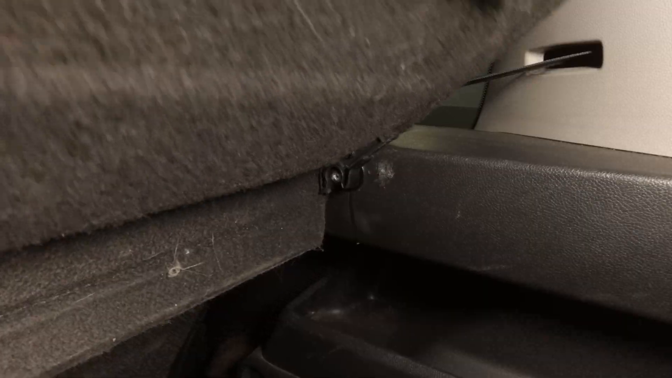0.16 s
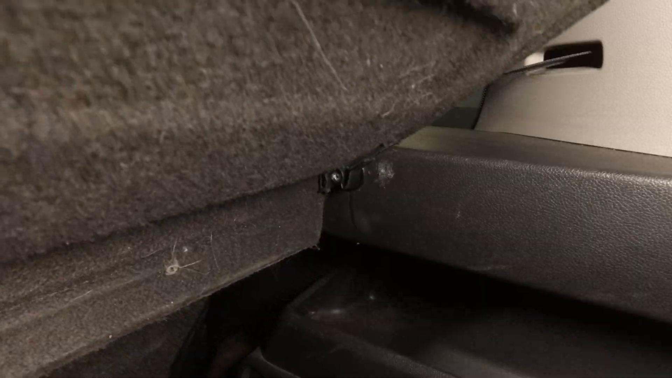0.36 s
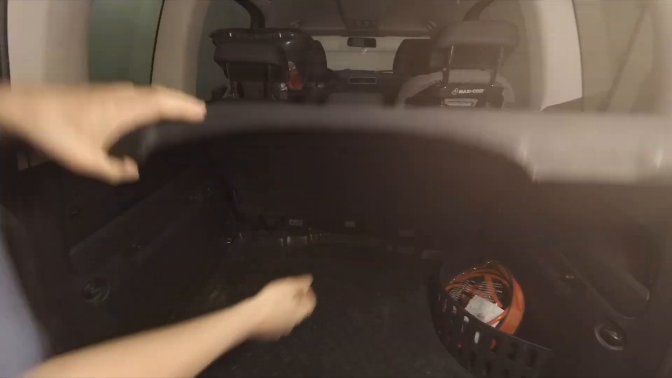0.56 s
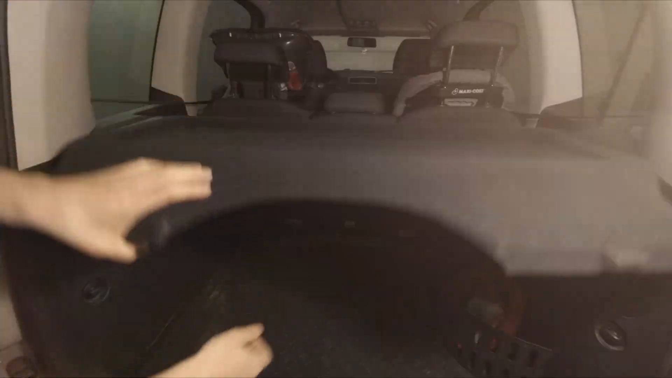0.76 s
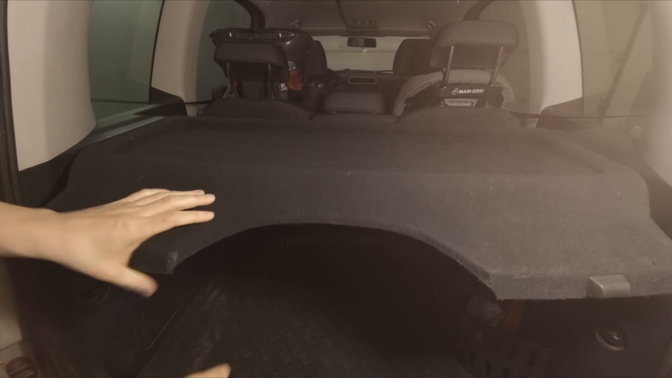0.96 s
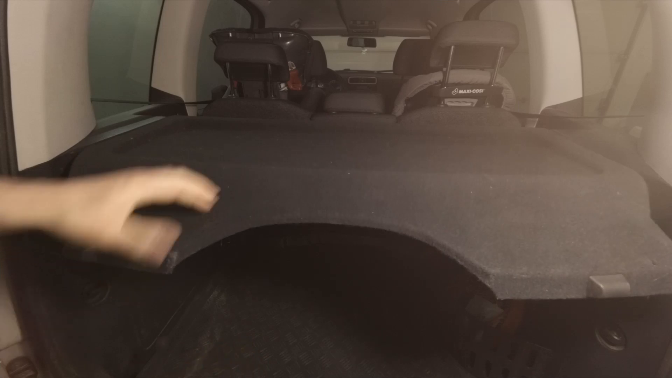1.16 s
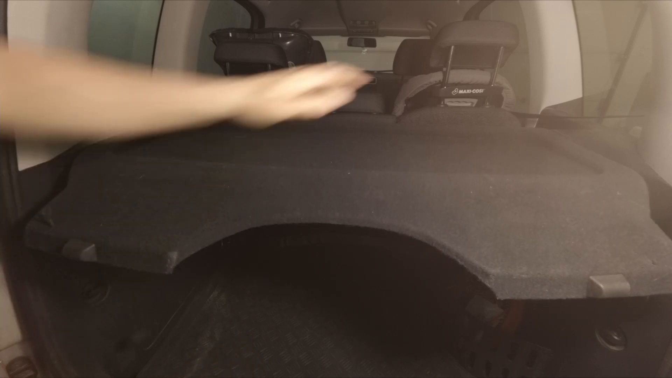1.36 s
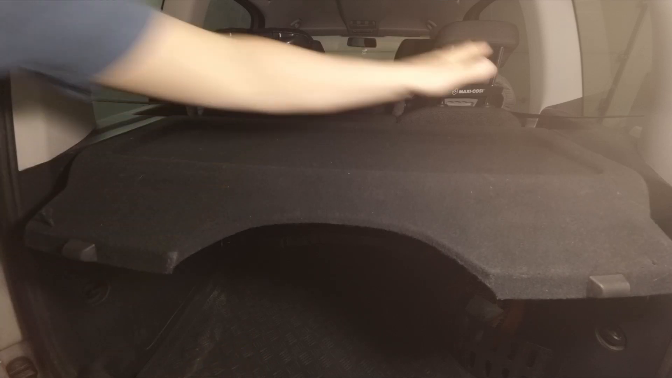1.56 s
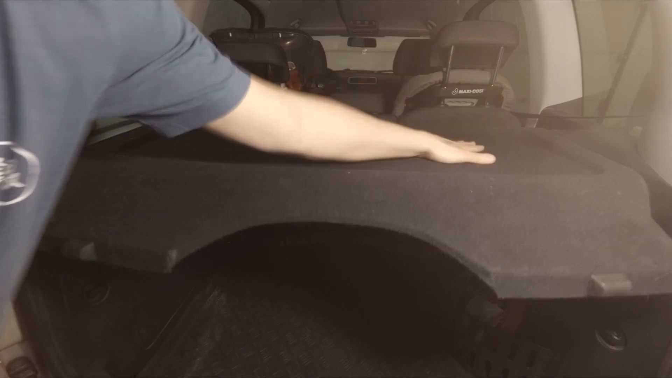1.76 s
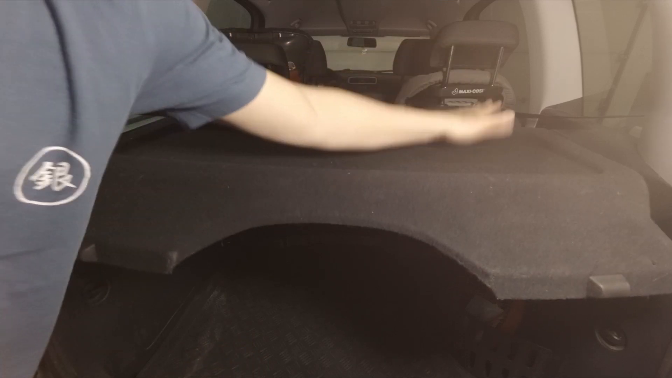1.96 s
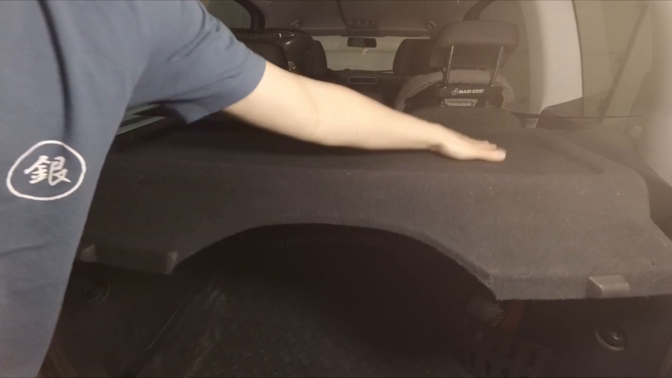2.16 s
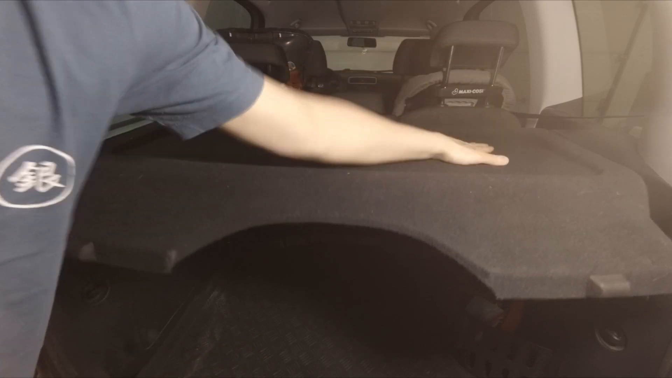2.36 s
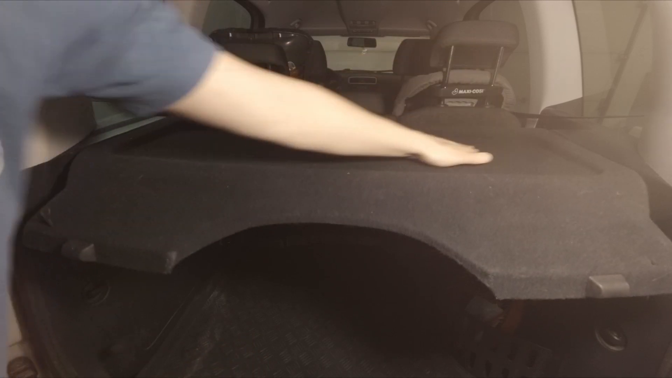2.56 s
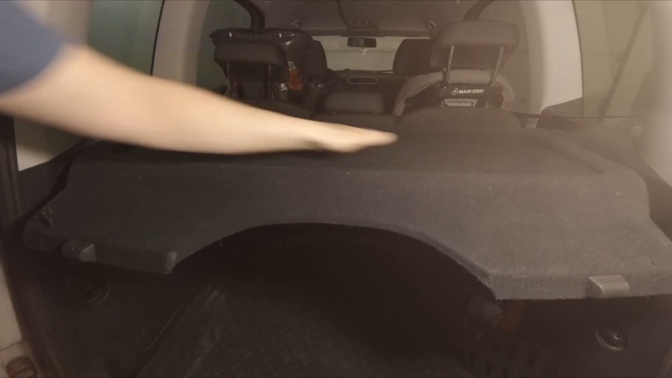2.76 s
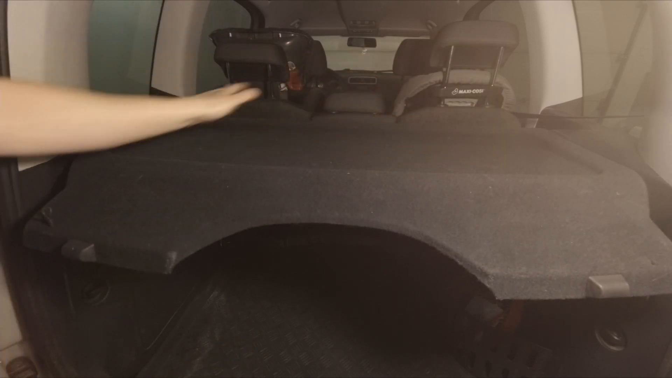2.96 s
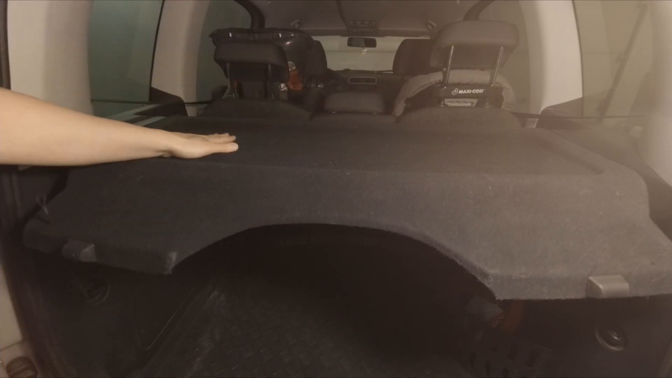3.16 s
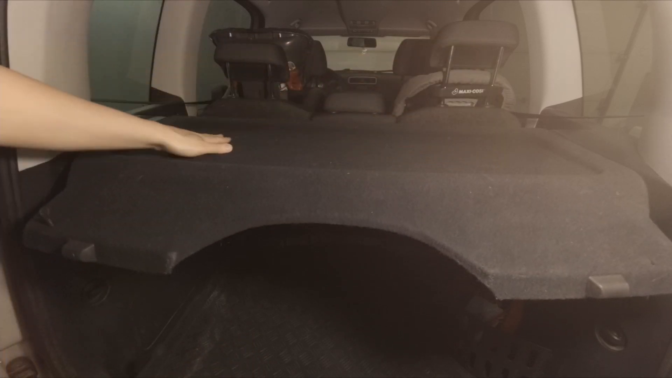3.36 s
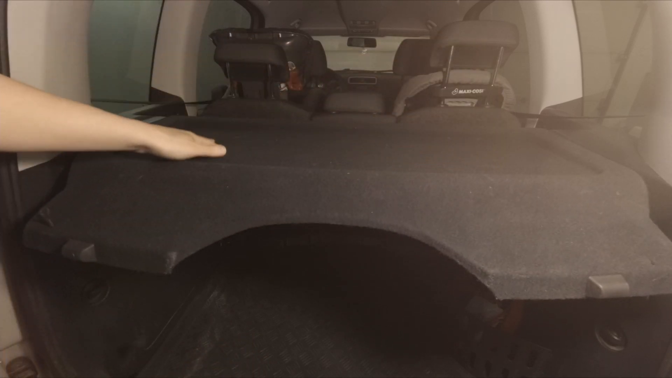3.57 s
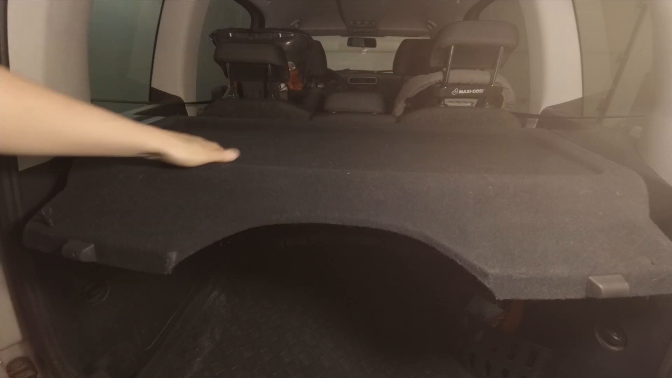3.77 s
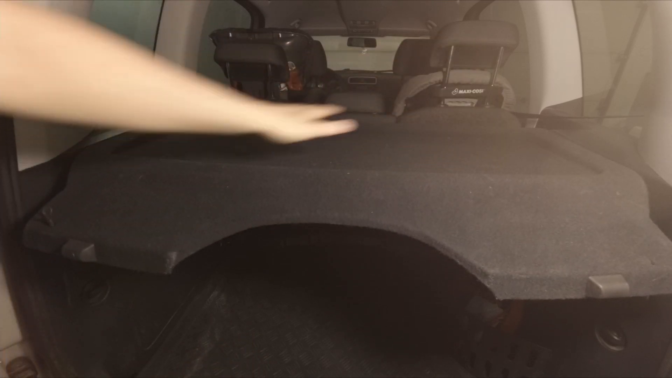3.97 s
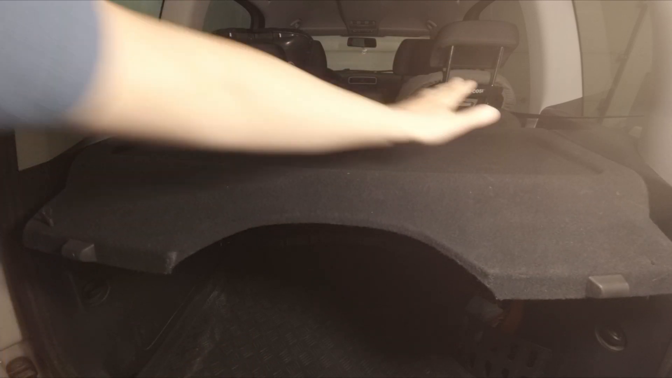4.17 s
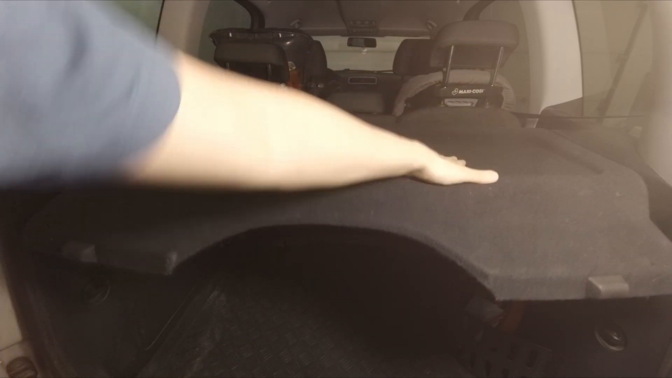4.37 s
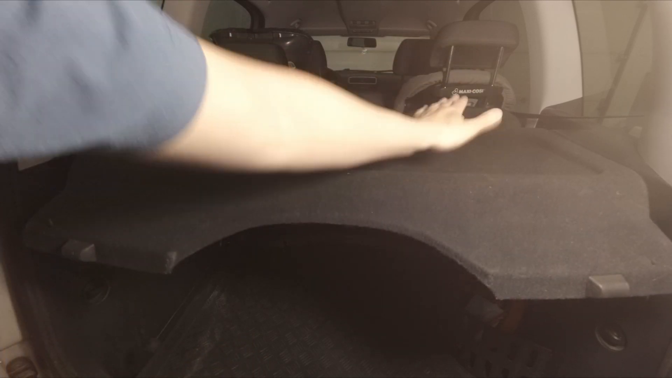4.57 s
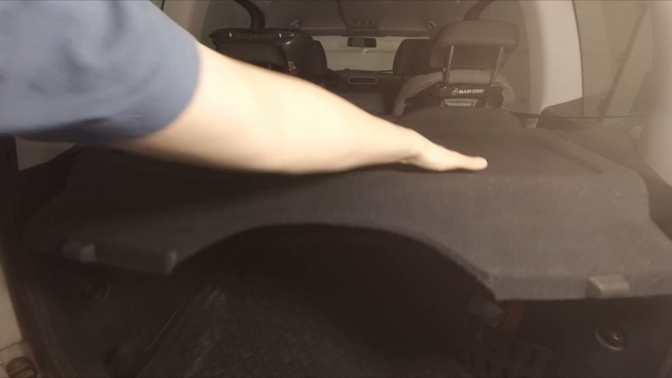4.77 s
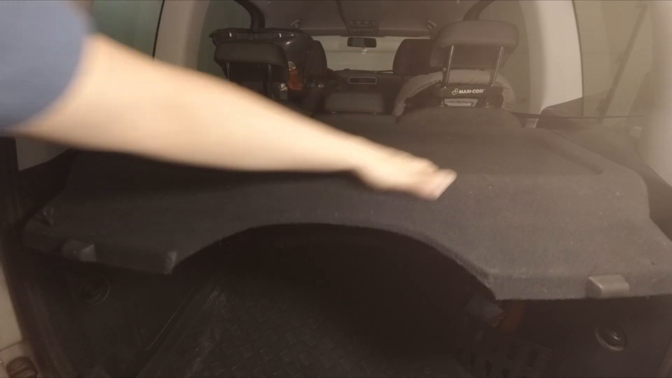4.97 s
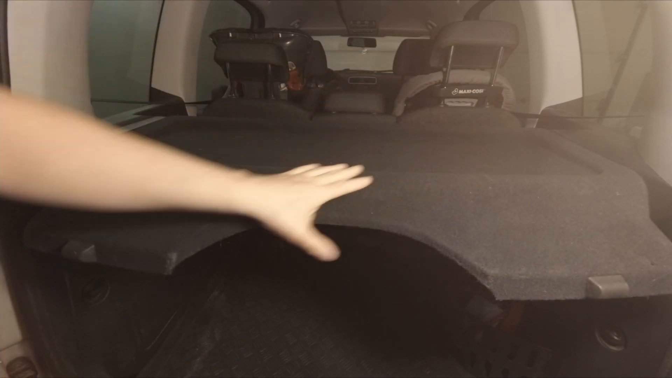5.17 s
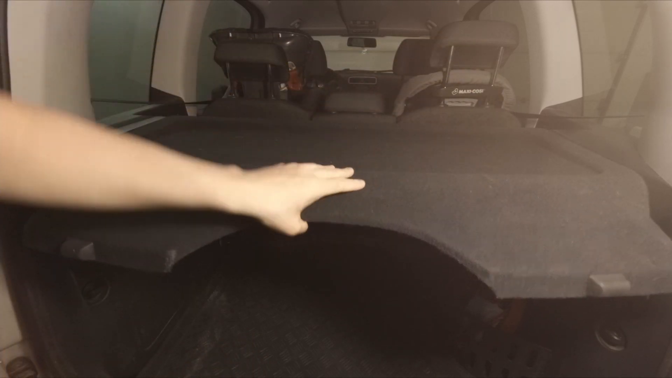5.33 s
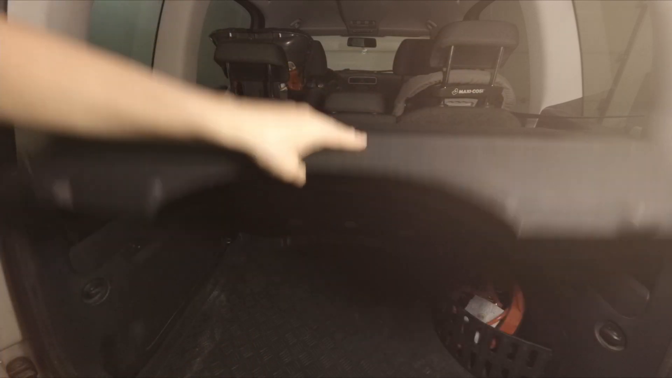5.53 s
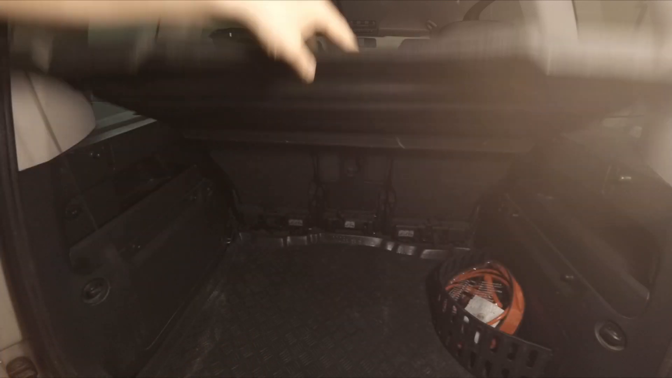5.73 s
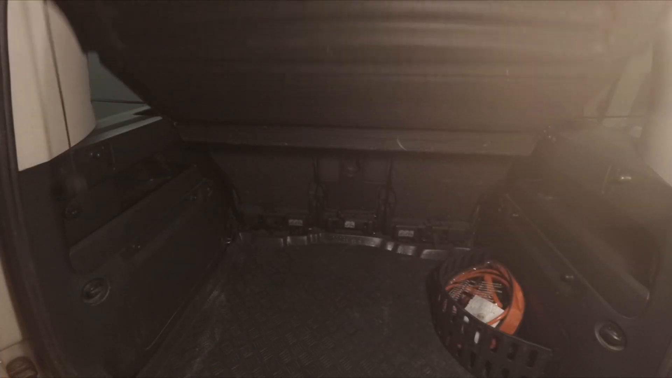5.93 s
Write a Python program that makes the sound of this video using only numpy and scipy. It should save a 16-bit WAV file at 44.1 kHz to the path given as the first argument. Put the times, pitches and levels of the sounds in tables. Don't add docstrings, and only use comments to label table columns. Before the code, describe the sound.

Near silence with tiny trim ticks, then a felted board grinds down on a slipping plastic pivot and clatters onto its pins. Six hard open-hand slaps follow, three close together, one alone, then a pair, each a dull woody thud with low trunk boom, bright rattle and short garage echo whose tail is cut down quickly. Soft skin hiss, scraping and a faint creak end it. Close mono microphone.

```python
import sys
import numpy as np
from scipy import signal
from scipy.fft import rfft, irfft, next_fast_len
from scipy.io import wavfile
from scipy.ndimage import uniform_filter1d, map_coordinates

SR = 44100
rng = np.random.default_rng(int(sys.argv[2]) if len(sys.argv) > 2 else 0)


def generate_wav(sig):
    pcm = np.round(np.clip(np.atleast_2d(sig).T, -1, 1) * 32767).astype(np.int16)
    wavfile.write(sys.argv[1], SR, pcm)


def amplitude_ratio(level_db):
    exponent = np.asarray(level_db, float) / 20
    return 10 ** exponent


N = 264588


def unit(x):
    return x / np.sqrt(np.mean(x ** 2) + 1e-20)


def along(points, hz):
    f, v = np.transpose(points)
    return np.interp(np.log(hz + 1), np.log(f + 1), v)


def noise(size, spectrum, tilt_db=0):
    m = next_fast_len(size)
    hz = np.fft.rfftfreq(m, 1 / SR)
    gain = amplitude_ratio(along(spectrum, hz) + tilt_db * np.log2(1 + hz / 1000))
    return unit(irfft(rfft(rng.standard_normal(m)) * gain, m)[:size])


def hump(hz, skirt_db):
    return [(hz / 5, 3 * skirt_db), (hz / 2, skirt_db), (hz, 0), (hz * 1.3, skirt_db), (hz * 5, 3 * skirt_db)]


def wobble(rate):
    knots = rng.standard_normal(int(N * rate / SR) + 4)
    return map_coordinates(knots, [np.arange(N) * rate / SR])


def add(out, s, sound):
    out[round(s * SR):][:len(sound)] += sound


# f/Hz, t60/s
GARAGE_DECAY = [(100, 0.6), (400, 0.64), (1500, 0.84), (5000, 1), (12000, 0.42)]


def garage(x, wet_db, size):
    hz, t, z = signal.stft(rng.standard_normal(size), SR, nperseg=256)
    fade = amplitude_ratio(-60 * t / along(GARAGE_DECAY, hz)[:, None])
    tail = signal.istft(z * fade, SR, nperseg=256)[1]
    tail = tail / np.linalg.norm(tail)
    wet = signal.fftconvolve(np.pad(x, (300, 0)), tail)[:len(tail)]
    return np.pad(x, (0, len(wet) - len(x))) + amplitude_ratio(wet_db) * wet


# f/Hz, level/dB, t60/s
BOARD_TONES = [(195.5, 10, 0.4), (310, -3, 1), (371, -27, 0.99), (420, -10, 0.44), (566.8, -6, 1),
               (690, -13.5, 0.77), (940, -1, 0.071), (1022, -20.5, 0.62), (1045, -11, 0.26),
               (1143.5, -14.5, 0.99)]


def ring(t, scatter_db, shorten):
    out = 0
    for hz, db, t60 in BOARD_TONES:
        fade = amplitude_ratio(db + scatter_db * rng.standard_normal() - 60 * t / (t60 * shorten))
        out = out + fade * np.sin(2 * np.pi * hz * t)
    return out


# f/Hz, level per Hz/dB
BOARD_SHUDDER = [(82, -23.5), (140, -0.5), (498, -4.5), (903, -8), (1480, -12.5), (1640, -16), (2630, -22),
                 (2850, -25.5), (5820, -35.5), (8830, -38.5), (10600, -50.5), (13100, -52), (16000, -63)]


def strike_board(rows, rise_s, t60_s, room_db):
    out, t = np.zeros(N + SR), np.arange(SR // 4) / SR
    for s, db, hz, thud_db, hard_db in rows:
        press = t * hz / 0.56
        thud = np.sin(2 * np.pi * hz * t) * amplitude_ratio(thud_db - 1.5) * press * np.exp(1 - press)
        grains = np.interp(t * 400, np.arange(128), rng.standard_normal(128))
        chatter = amplitude_ratio(3.5 * grains)
        shudder = unit(noise(len(t), BOARD_SHUDDER, hard_db) * chatter) * amplitude_ratio(-4 - 60 * t / t60_s)
        tones = amplitude_ratio(-19.5) * ring(t, scatter_db=3, shorten=0.23)
        blow = thud + (1 - np.exp(-t / rise_s)) * (shudder + tones)
        add(out, s, amplitude_ratio(db) * garage(blow, wet_db=room_db, size=SR * 2 // 3))
    return out[:N]


# t/s, peak level/dB, thud f/Hz, thud share/dB, hardness/dB per octave
SLAPS = [(1.834, -25, 477, -4, -6), (1.838, -3, 415, -4, -3.5), (1.846, -5.5, 430, -3.5, 3),
         (1.856, -10.5, 330, -1.5, 1.5), (2.131, -3, 416, 4, 0.5), (2.138, -6.5, 620, -1.5, 3),
         (2.143, -7.5, 278, 1.5, 0.5), (2.4362, -2, 594, 0, -2), (2.447, -5, 410, -3.5, 2.5),
         (3.155, -48, 300, -4, -7), (3.1699, -10.5, 450, 5.5, 0.5), (3.1797, -5, 309, -7.5, 2.5),
         (4.392, -45, 334, -7.5, 0), (4.396, -32, 400, -6, 1), (4.401, -13, 613, -6.5, -2),
         (4.404, -12.5, 373, 2, 2.5), (4.411, -10.5, 430, 0.5, -7), (4.7558, -4.5, 825, -8.5, 1),
         (4.761, -3.5, 343, -5.5, -2)]


def slaps():
    return strike_board(SLAPS, rise_s=0.003, t60_s=0.079, room_db=-8)


# t/s, peak level/dB, hardness/dB per octave
PIN_BOUNCES = [
    (1.895, -15, 4),
    (2.189, -24, 5.5),
    (2.495, -10, 2),
    (3.234, -17, 1.5),
    (3.26, -16, -4.5),
    (4.458, -13.5, -1.5),
    (4.807, -8.5, -3),
    (4.898, -17.5, -2),
]


def bounces():
    rows = [(s, db, 330, -13.5, hard_db) for s, db, hard_db in PIN_BOUNCES]
    return strike_board(rows, rise_s=0.008, t60_s=0.1, room_db=-8)


# t/s, peak level/dB, thud f/Hz, thud share/dB, hardness/dB per octave
PIN_DROPS = [
    (0.9577, -22.5, 414, 0.5, -0.5),
    (.9725, -10, 358, -8, 0),
    (.979, -16, 406, -3, -2),
    (.987, -14, 250, -0.5, -11),
    (.999, -20, 294, -3, -1),
    (1.013, -20, 140, 3, -6),
    (5.48, -42, 353, -1.5, -5),
    (5.498, -39, 629, -1, -8),
    (5.515, -40.5, 222, 2.5, -12),
]


def drops():
    return strike_board(PIN_DROPS, rise_s=0.003, t60_s=0.062, room_db=-11.5)


def gate(x, threshold_db, depth_db):
    level_db = 10 * np.log10(np.abs(uniform_filter1d(x ** 2, 2500)) + 1e-12)
    return x * amplitude_ratio(np.clip(level_db - threshold_db, depth_db, 0))


# t/s, air level/dB, lid level/dB, air t60/s, lid t60/s
TRUNK_BOOMS = [(.76, -72, -63, .6, 0.73), (.91, -49, -48, 0.41, 0.61), (.96, -32, -20, 0.29, .22),
               (1.07, -50.5, -44, 1.1, .7), (1.837, -28, -21, 0.58, 0.44), (1.99, -44.5, -36, 1.17, 1.3),
               (2.13, -27, -23.5, 0.6, 0.58), (2.437, -24.5, -23, 0.56, .5), (2.6, -36.5, -37, .6, 0.47),
               (3.0, -63.5, -73, 1.2, 0.82), (3.169, -38.5, -20.5, .9, 0.57),
               (4.399, -35.5, -20.5, 0.5, 0.44), (4.56, -43.5, -40, .7, 0.81),
               (4.757, -38, -35.5, 0.91, 1.1), (4.82, -40.5, -31.5, 0.93, .75),
               (5.485, -47, -47, 0.56, .28)]
# f/Hz, level/dB
AIR_MODES = [(62, -13.5), (68, 0)]
# f/Hz, level/dB
LID_MODES = [(111, -2.5), (120, 1), (150, -7.5)]


def trunk():
    time = np.arange(N) / SR
    start, air_db, lid_db, air_t60, lid_t60 = np.transpose(TRUNK_BOOMS)[..., None]
    since = np.clip(time - start, 0, None)
    rest_db, gate_db, fade = -84, -56, 1.8
    out = 0
    for db, t60, build_s, modes in (air_db, air_t60, 0.018, AIR_MODES), (lid_db, lid_t60, 0.02, LID_MODES):
        build = 1 - np.exp(-(since / build_s) ** 2)
        gain = np.sum(amplitude_ratio(db + 1.5 - 60 * since / t60) * build, axis=0)
        gain = gain * np.minimum(1, gain / amplitude_ratio(gate_db)) ** fade
        flutter = amplitude_ratio(2.5 * wobble(16))
        tones = sum(amplitude_ratio(mode_db) * np.sin(2 * np.pi * hz * time + 2.4 * wobble(10)) for hz, mode_db in modes)
        out = out + (gain + amplitude_ratio(rest_db)) * flutter * unit(tones)
    return out


def click_plastic(rows, click_hz, t60_s, rise_s):
    out, t = np.zeros(N + SR), np.arange(SR // 10) / SR
    for s, db, body_db, body_hz in rows:
        fade = amplitude_ratio(-60 * t / t60_s - 3.5) + amplitude_ratio(1.5 - 60 * t / 0.0074)
        click = noise(len(t), hump(click_hz, skirt_db=-5.5)) * fade
        knock = noise(len(t), hump(body_hz, skirt_db=-13)) * amplitude_ratio(body_db - 60 * t / (2.05 * t60_s))
        contact = (1 - np.exp(-t / rise_s)) * (click + knock)
        add(out, s, amplitude_ratio(db - 8) * garage(contact, wet_db=-10.5, size=SR // 3))
    return out[:N]


# t/s, peak level/dB
PIN_RATTLES = [(1.2521, -63), (1.6395, -56), (1.738, -50), (1.7514, -53), (1.7664, -43.5), (1.786, -48),
               (1.8512, -16), (1.8982, -20.5), (2.1472, -21), (2.19, -22.5), (2.4498, -16.5),
               (2.4974, -22.5), (3.1837, -22), (3.2344, -38.5), (4.4074, -32), (4.4664, -45.5),
               (4.764, -32.5), (4.813, -30), (5.7565, -42)]


def rattles():
    rows = [(s, db, -12, 1500) for s, db in PIN_RATTLES]
    return click_plastic(rows, click_hz=7200, t60_s=0.036, rise_s=0.002)


# t/s, peak level/dB, body level/dB, body f/Hz
PIVOT_SLIPS = [(0.4683, -32.5, -14, 614), (0.4978, -25, -2, 626), (0.5341, -52, 3, 1390),
               (0.5694, -43, 13, 579), (0.5948, -35, -8, 345), (0.614, -33, -9, 676),
               (0.6408, -37, -21, 614), (0.6777, -35.5, -19, 568), (0.7446, -35, -14, 1530),
               (0.7546, -33, -7, 260), (0.7771, -38, -1, 212), (0.8043, -29, -20, 202),
               (0.823, -29.5, -20, 275), (0.849, -26.5, -1, 198), (0.889, -28, -0.5, 435),
               (0.9334, -31, 2, 401), (1.0279, -21.5, -21, 202), (1.043, -27.5, -14, 256),
               (1.0544, -34.5, -5, 320), (1.0733, -37, 10, 525), (1.103, -52, -12, 234),
               (1.1218, -37, -8, 221), (1.1998, -40.5, -2, 415)]


def slips():
    return click_plastic(PIVOT_SLIPS, click_hz=3500, t60_s=0.024, rise_s=0.001)


# t/s, peak level/dB, body level/dB, body f/Hz
TRIM_TICKS = [(0.0374, -61.5, 14.5, 312), (0.2384, -56, 22, 346), (0.286, -41.5, -6, 818),
              (0.2944, -50.5, 5, 1210), (0.3734, -53, 4, 1200), (0.397, -52, 7, 388), (0.41, -51.5, 7, 336),
              (2.955, -49, 5, 452), (3.0896, -59, 9.5, 290), (3.4007, -44.5, -0.5, 220),
              (3.488, -41, 0, 511), (3.7819, -51, 0, 258), (3.8341, -54, -3, 371),
              (3.9123, -51.5, 4.5, 200)]


def ticks():
    return click_plastic(TRIM_TICKS, click_hz=4020, t60_s=0.023, rise_s=0.001)


def swells(start, top, end):
    time = np.arange(N) / SR
    edges = np.clip(np.minimum(time - start, end - time) / 0.015, 0, 1)
    return edges * amplitude_ratio(np.interp(time, [start, top, end], [-18.5, 0, -23]))


# start t/s, fastest t/s, end t/s, hiss level/dB, scrape level/dB
MOVES = [(0.453, 0.489, 0.83, -52.5, -48), (0.71, .8, 1.03, -57.5, -56), (.8, 0.893, 1.1, -61, -53),
         (1.317, 1.393, 1.72, -52, -96), (2.493, 2.58, 2.92, -62, -44), (2.55, 2.66, 2.74, -56, -55),
         (.87, .9, .96, -58, -46), (3.38, 3.48, 3.53, -66, -58), (3.3, 3.376, 3.12, -68, -54),
         (3.55, 3.651, 3.94, -73.5, -70), (4.844, 4.982, 5.214, -64, -44.5),
         (4.892, 5.172, 5.32, -53, -65.5), (5.098, 5.329, 5.48, -54.5, -84),
         (5.304, 5.42, 5.03, -59, -75.5), (1.515, 1.724, 1.84, -69, -75), (0, 0.046, 0.13, -97, -78),
         (5.395, 5.495, 5.78, -70, -65), (5.597, 5.85, 6.22, -71, -73.5)]
# f/Hz, level per Hz/dB
FELT_HISS = [(590, -46), (1000, -12), (1080, -26), (1260, -7), (1960, 3.5), (2150, -1.5), (3340, 1),
             (4120, -0.5), (4470, 3.5), (5440, -2.5), (7880, 1), (12800, -11.5), (16000, -27)]
# f/Hz, level per Hz/dB
SLIDE_HISS = [(410, -37), (700, -10.5), (1460, -3.5), (1970, -4.5), (2660, -4), (5190, -8.5), (12000, -10),
              (14200, -18.5), (16000, -35.5)]
# f/Hz, level per Hz/dB
BOARD_SCRAPE = [(47, -39.5), (80, -17.5), (131, 2.5), (470, 5.5), (575, 7), (1170, 0.5), (1430, -1),
                (2500, -13), (3250, -35.5), (5500, -120)]


def strokes():
    time = np.arange(N) / SR
    palm = np.where(time < 2, noise(N, FELT_HISS), noise(N, SLIDE_HISS))
    grit_db = 2.5 * (time < 1.25) * wobble(90)
    hiss = unit(palm * amplitude_ratio(0.77 * wobble(220) + grit_db))
    scrape = unit(noise(N, BOARD_SCRAPE) * amplitude_ratio(3.5 * wobble(70)))
    hiss_gain, scrape_gain = amplitude_ratio(-77.5), amplitude_ratio(-74.5)
    for start, top, end, hiss_db, scrape_db in MOVES:
        speed = swells(start, top, end)
        hiss_gain = hiss_gain + amplitude_ratio(hiss_db) * speed
        scrape_gain = scrape_gain + amplitude_ratio(scrape_db) * speed
    return hiss_gain * hiss + scrape_gain * scrape


# start t/s, end t/s, level/dB, first f/Hz, last f/Hz
RUBBING_CREAKS = [
    (.48, 0.595, -44, 1350, 1400),
    (1.31, 1.66, -73, 1720, 1880),
    (5.18, 5.378, -61, 1416, 1520),
    (5.76, 5.999, -70.5, 1330, 1180),
]


def creaks():
    time = np.arange(N) / SR
    knots, gain = [], 0
    for start, end, db, first_hz, last_hz in RUBBING_CREAKS:
        knots += [(start, first_hz), (end, last_hz)]
        gain = gain + amplitude_ratio(db) * swells(start, start + 0.42 * (end - start), end)
    pitch_hz = np.interp(time, *np.transpose(knots))
    return gain * unit(wobble(380) * np.sin(2 * np.pi * np.cumsum(pitch_hz) / SR))


# f/Hz, level per Hz/dB
GARAGE_AIR = [(15, -18), (25, -16), (64, -6.5), (127, -8.5), (317, -10), (427, -18.5), (659, -14),
              (734, -9), (911, -10), (1260, -10.5), (2280, -19.5), (14800, -38), (16000, -36.5)]
# f/Hz, level/dB
ELECTRIC_WHINE = [(15235, -91)]


def air():
    time = np.arange(N) / SR
    whine = sum(amplitude_ratio(db + 1) * np.sin(2 * np.pi * hz * time) for hz, db in ELECTRIC_WHINE)
    return whine + noise(N, GARAGE_AIR) * amplitude_ratio(-77.5 + 0.9 * wobble(15) + wobble(46))


def scene():
    blows = gate(slaps() + bounces() + drops(), threshold_db=-45.5, depth_db=-37)
    plastic = rattles() + slips() + ticks()
    handling = strokes() + creaks()
    return np.array([blows + trunk() + plastic + handling + air()])


def top_cut(x):
    return signal.sosfilt(signal.butter(12, 16450, fs=SR, output="sos"), x)


# f/Hz, level/dB
MICROPHONE_TREBLE = [(14000, -0.5), (15600, -12.5), (16400, -57.5)]


def record(dry):
    size = next_fast_len(N)
    gain = amplitude_ratio(along(MICROPHONE_TREBLE, np.fft.rfftfreq(size, 1 / SR)))
    heard = irfft(rfft(dry, size) * gain, size)[:, :N]
    bass_cut = signal.butter(3, 50, btype="high", fs=SR, output="sos")
    heard = signal.sosfilt(bass_cut, heard)
    mix = heard / (1 + np.abs(heard / 1.5) ** 6) ** (1 / 6)
    return top_cut(mix)


dry = scene()
out = record(dry)
generate_wav(out)
```